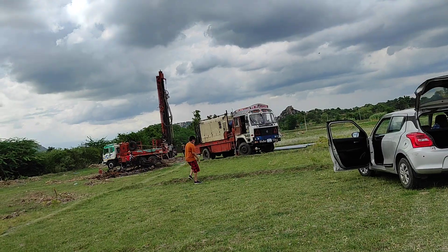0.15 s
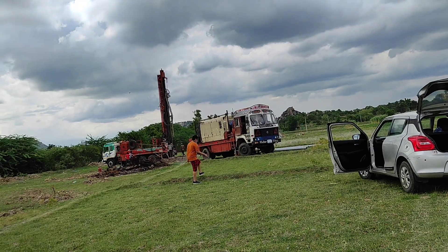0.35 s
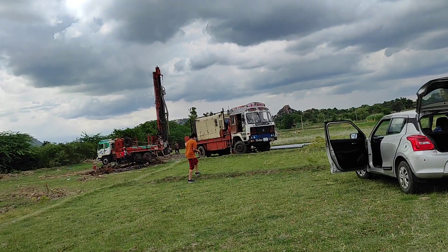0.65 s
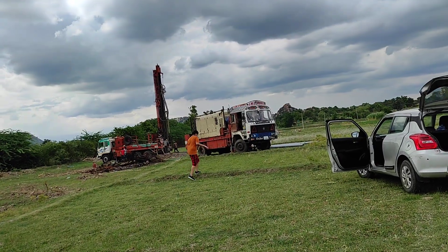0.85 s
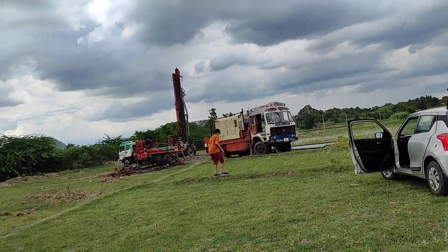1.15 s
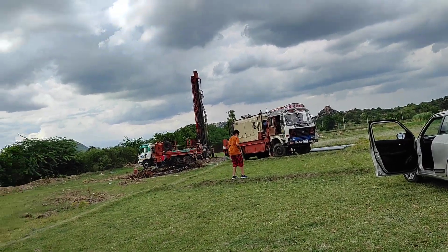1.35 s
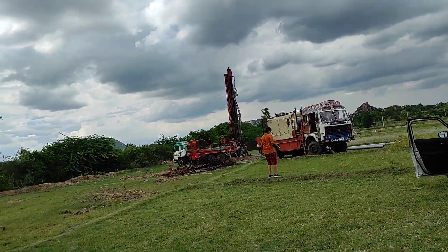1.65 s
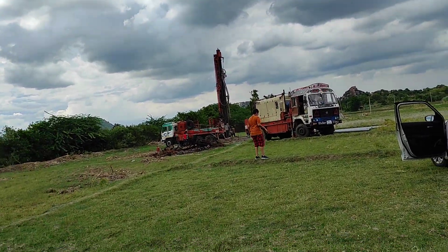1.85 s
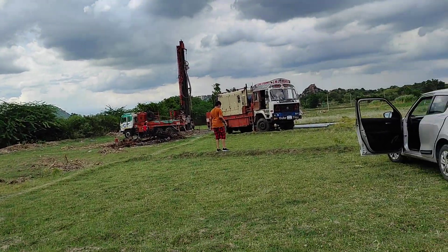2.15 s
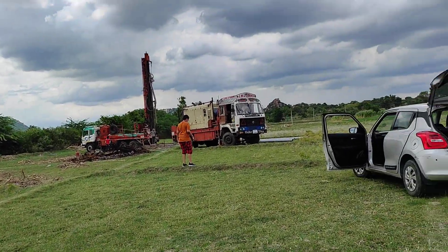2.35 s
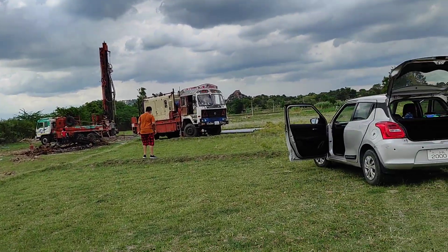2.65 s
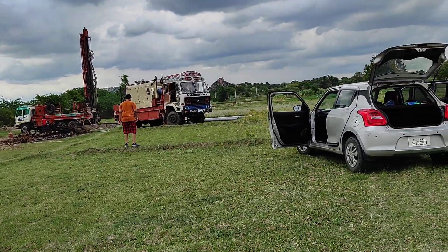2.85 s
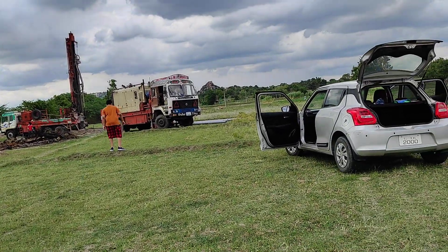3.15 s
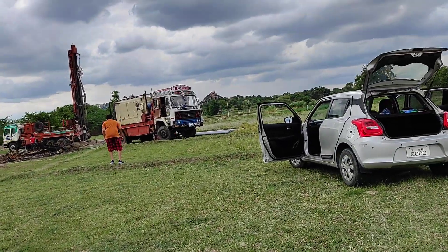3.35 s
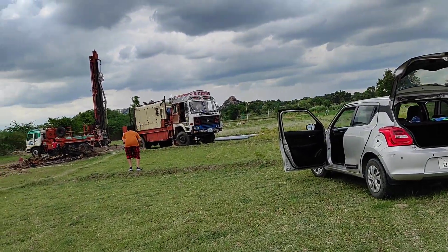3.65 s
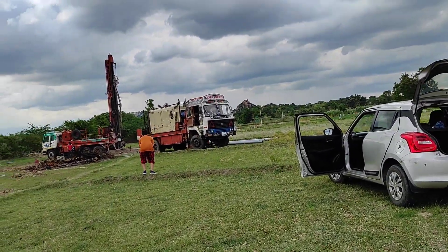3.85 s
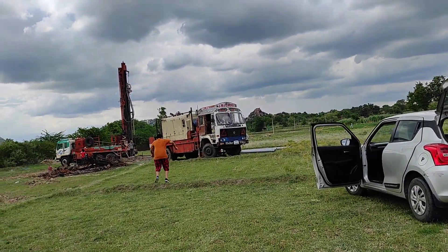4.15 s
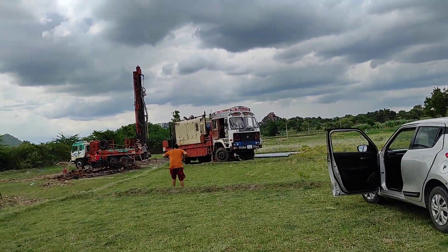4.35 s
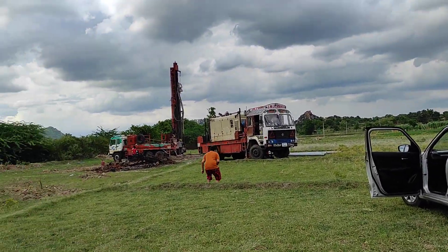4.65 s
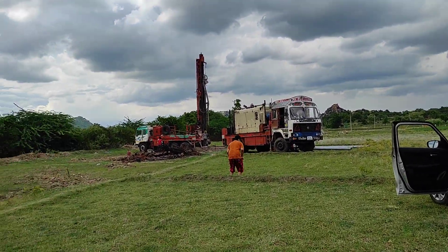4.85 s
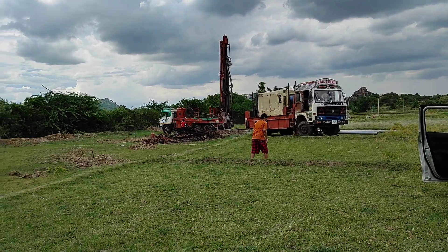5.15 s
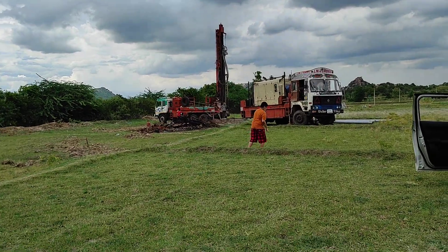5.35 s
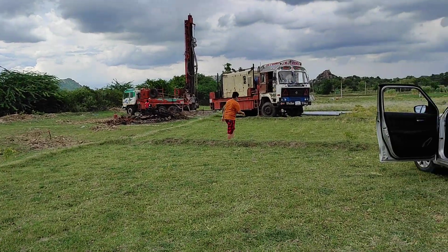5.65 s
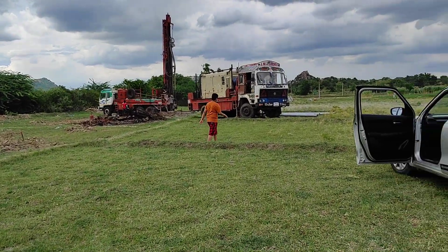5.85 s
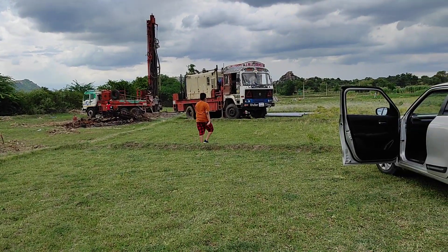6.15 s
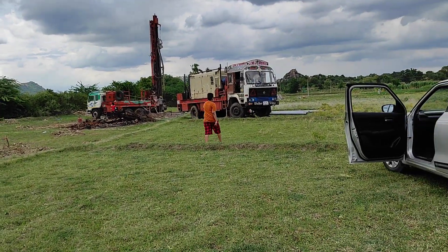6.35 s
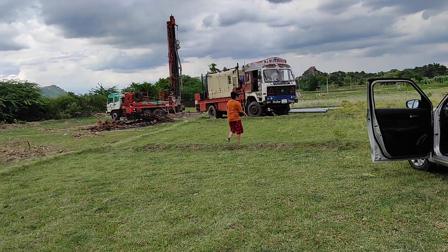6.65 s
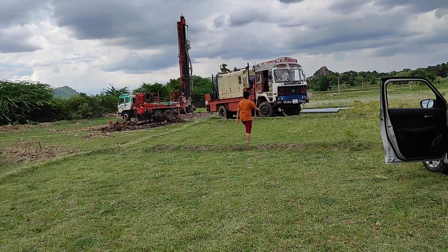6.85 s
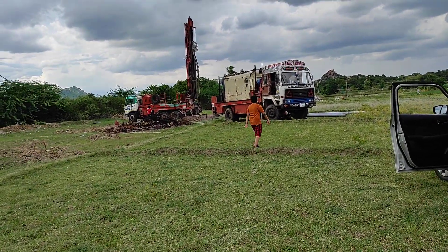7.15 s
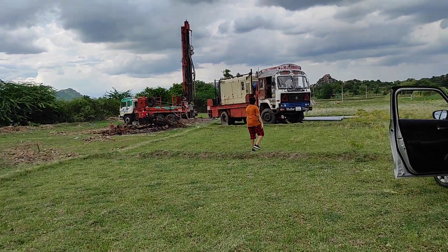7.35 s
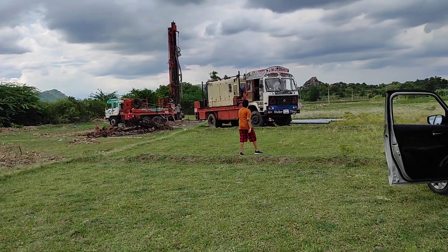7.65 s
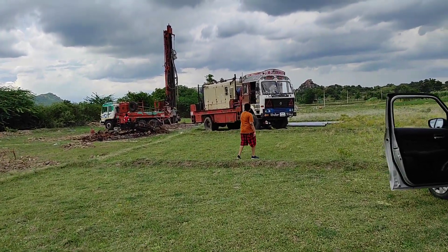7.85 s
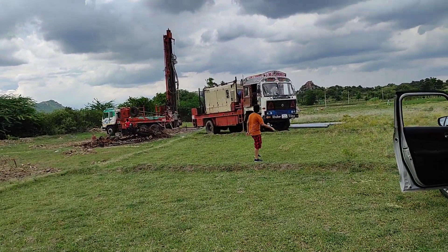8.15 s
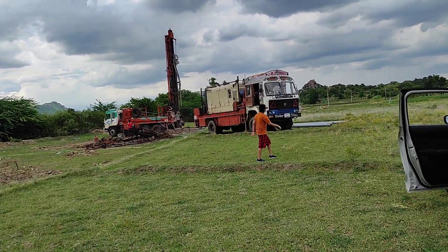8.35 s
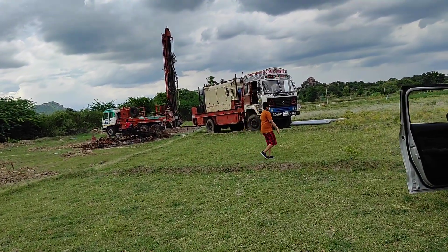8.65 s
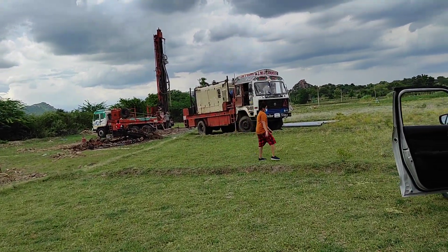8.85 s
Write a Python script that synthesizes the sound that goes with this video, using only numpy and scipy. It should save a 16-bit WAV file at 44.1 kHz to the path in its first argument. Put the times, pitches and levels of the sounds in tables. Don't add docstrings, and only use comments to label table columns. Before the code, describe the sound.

Outdoors in an open grassy field, a truck-mounted drilling rig runs steadily some distance away: a low diesel drone near 100 hertz, exhaust roar, hissing fan and air, a thin high turbine whine. Wind on the hand-held stereo phone begins light, builds to heavy buffeting and thumps in the middle, mostly on the left, then eases.

```python
import sys
import numpy as np
from scipy import signal
from scipy.io import wavfile
from scipy.ndimage import uniform_filter1d, minimum_filter1d

SR = 44100
rng = np.random.default_rng(int(sys.argv[2]) if len(sys.argv) > 2 else 0)


def convert_level_to_amplitude(level_db):
    exponent = np.asarray(level_db, float) / 20
    return 10 ** exponent


def inscribe(sig):
    pcm = np.round(np.clip(np.atleast_2d(sig).T, -1, 1) * 32767)
    wavfile.write(sys.argv[1], SR, pcm.astype(np.int16))


N = 397782
TIME = np.arange(N) / SR
HZ = np.fft.rfftfreq(1024, 1 / SR)[:, None]
CYCLE_HZ = 16.41

# t/s, level/dB
LEFT_GUSTS = [(0, -31), (.5, -23.5), (.75, -19.5), (1.4, -20.5), (1.7, -26), (1.9, -17.5), (2.5, -15.5),
              (2.7, -14.5), (3.4, -12), (3.85, -12.5), (4.5, -12.5), (4.85, -12.5), (5.05, -17.5),
              (5.65, -16.5), (6.0, -13.5), (6.7, -19), (7.4, -19), (9.02, -24)]
# t/s, level/dB
RIGHT_GUSTS = [(0, -41), (1.0, -32), (1.45, -32), (2.45, -38), (2.62, -28), (3.25, -25), (3.45, -21.5),
               (4.0, -22.5), (4.22, -25), (4.45, -18), (4.65, -30), (5.1, -25), (5.35, -35.5), (6.2, -26.5),
               (7.5, -35), (7.9, -31), (8.3, -38), (9.02, -38)]
# f/Hz, level/(dB per Hz)
WIND_COLOUR = [
    [(10, -14), (40, -2), (90, -2), (125, -4), (180, 0), (300, -9), (500, -17), (900, -30), (2000, -55),
     (5000, -90)],
    [(10, -8), (25, 0), (60, -4), (120, -11), (200, -10), (300, -16), (500, -30), (900, -48), (5000, -90)],
]
# t/s, level/dB
THUMP_TIMES = [
    [(2.314, -25), (2.636, -24), (2.994, -21), (3.227, -20), (3.383, -13), (3.445, -16), (3.535, -29), (3.601, -28), (3.705, -17), (4.029, -19), (4.291, -25), (4.383, -19), (4.504, -13), (4.653, -18), (4.757, -29), (5.632, -18), (5.943, -19.5), (6.006, -17), (6.198, -17.5), (6.484, -26)],
    [(2.946, -25), (3.266, -31), (3.425, -16), (3.633, -31), (3.907, -32), (3.996, -25), (4.367, -21), (4.477, -19)],
]
# f/Hz, level/(dB per Hz)
THUMP_COLOUR = [(20, -14), (100, -5), (250, -1), (400, 0), (600, -13.5), (1000, -22.5), (3000, -66)]
# multiple of the cycle, level/dB rms
ENGINE_ORDERS = [(6, -26), (9, -37), (11, -34.5), (12, -32.5), (13, -44.5), (15, -41), (16, -38), (18, -36),
                 (24, -43.5), (25, -51.5), (26, -47), (55, -51.5), (96, -57.5), (100, -64)]
# f/Hz, level/dB rms, waver/Hz
ROTOR_TONES = [(140.3, -36, .4), (280.8, -44, .6), (1122, -59, 1.5), (1334, -54, 3.), (2508, -70, 6.)]
# t/s, f/Hz, level/dB
TURBINE_WHINE = [(0, 10725, -62), (1.4, 10705, -62), (2.2, 10685, -62), (2.7, 10665, -62),
                 (3.2, 10685, -62), (4.2, 10680, -63), (4.7, 10665, -62), (6.2, 10680, -61),
                 (9.02, 10690, -61)]
# f/Hz, level/(dB per Hz)
EXHAUST_COLOUR = [(30, -59), (120, -64.5), (150, -49.5), (210, -46), (300, -56.5), (400, -61.5),
                  (470, -65.5), (570, -54.5), (650, -59.5), (780, -53.5), (900, -62), (1030, -67),
                  (1350, -64.5), (1750, -69.5)]
# f/Hz, level/(dB per Hz)
AIR_COLOUR = [(1750, -69), (2450, -71.5), (2750, -70.5), (3100, -74), (3450, -70), (3800, -72),
              (4800, -75.5), (6200, -70.5), (7350, -65), (8250, -71), (9300, -80), (9900, -86),
              (10800, -89.5), (14200, -99)]
# t/s, level/dB
CARRY_OVER_FIELD = [(0.0, -29), (0.37, -30.8), (0.84, -30), (2.41, -29.5), (2.55, -27.5), (2.97, -28.5),
                    (3.07, -29.5), (3.3, -27.5), (4.09, -31.5), (4.27, -31), (4.46, -29.5), (4.6, -32.5),
                    (4.83, -26.5), (4.97, -29.5), (7.2, -28), (7.29, -29.5), (8.82, -28.5), (9.01, -28.1)]
# t/s, lead of the left port/microseconds
HAND_SWAY = [(0, 10), (.95, -14), (1.36, 5), (1.57, 106), (2.15, 62), (2.35, -8), (3.0, -98), (3.55, -92),
             (4.05, -32), (4.55, -42), (5.03, 108), (5.45, 84), (6.08, -24), (6.75, -10), (6.95, 50),
             (8.1, -10), (8.55, 30), (9.02, -8)]
# f/Hz, louder by/dB
LEFT_DUCT_GAIN = [(100, 5), (650, 2), (980, 6), (1200, 2), (1550, 4.5), (2300, 2), (3100, -8), (3500, 1),
                  (5000, 4.5), (5800, 5), (6900, -9), (8300, 9), (9650, 10), (10450, 1.5)]
# f/Hz, lead/radians
LEFT_DUCT_TURN = [(400, -.1), (950, 0), (1090, -.7), (1350, -.1), (1900, -.8), (2600, -1.4), (2950, -.8),
                  (3270, -4.8), (3620, -5.7), (4300, -6.3), (6400, -7.2), (6750, -7.0), (7500, -5.0),
                  (9500, -6.8)]
# f/Hz, likeness/(0 to 1)
PORT_LIKENESS = [(100, .99), (900, .97), (1500, .92), (2400, .9), (3100, .6), (3700, .96), (5000, .96),
                 (6000, .92), (6900, .5), (8000, .7), (9500, .4), (10500, .2)]
# f/Hz, left/dB, right/dB
BODY_SHADE = [(300, 0.5, 0), (820, 0.6, 1.1), (1430, -1.5, -1.5), (2170, 0.7, -0.2), (3500, 0.5, -.5),
              (6000, .5, -.5), (9050, .5, -0.5)]
# f/Hz, level/(dB per Hz)
FAINTEST_KEPT = [(300, -72), (1000, -75), (2000, -78), (3200, -78.5), (5000, -78.5), (7000, -78),
                 (9000, -81), (10300, -81), (11000, -83), (12400, -90), (14200, -94)]


def evened(x):
    return x / np.sqrt(np.mean(x ** 2) + 1e-20)


def read(points, hz):
    f, value = np.transpose(points)
    return np.interp(np.log(hz + 1), np.log(f + 1), value)


def column(table, t, axis):
    columns = np.transpose(table)
    return np.interp(t, columns[0], columns[axis])


def frames(x):
    return signal.stft(x, SR, nperseg=1024, noverlap=768)[1:]


def sound(z):
    return signal.istft(z, SR, nperseg=1024, noverlap=768)[1][..., :N]


def level(z, lo_hz, hi_hz, size):
    band = z[(HZ[:, 0] > lo_hz) & (HZ[:, 0] < hi_hz)]
    power = 4 / 3 * (abs(band) ** 2).sum(0)
    return np.sqrt(uniform_filter1d(power, size) + 1e-20)


def drift(top_hz):
    rates = np.geomspace(top_hz / 30, top_hz, 16)[:, None]
    t = TIME[::256]
    waves = np.sin(2 * np.pi * (rates * t + rng.random(rates.shape)))
    slow = (waves / np.sqrt(rates)).sum(0)
    return np.interp(TIME, t, evened(slow))


def patchy(shape, tall, wide):
    field = uniform_filter1d(rng.standard_normal(shape), tall, 0)
    return evened(uniform_filter1d(field, wide, 1))


def buffeting():
    gust_db = column(LEFT_GUSTS, TIME, axis=1)
    turned = column(HAND_SWAY, TIME, axis=1) / 100
    bite_db = -5 + .3 * (gust_db - gust_db.mean()) - 1.2 * turned + 1.3 * drift(4.)
    left_db = gust_db + 0.55 * drift(4.)
    right_db = column(RIGHT_GUSTS, TIME, axis=1) + drift(4.)
    return left_db, right_db, bite_db


def wind():
    out = []
    left_db, right_db, left_bite_db = buffeting()
    ports = ((left_db, 290, -0.037), (right_db, 100, -1.0))  # level/dB, top of rumble/Hz, trim/dB
    for port, (gust_db, top_hz, trim_db) in enumerate(ports):
        lumps = evened(uniform_filter1d(uniform_filter1d(rng.standard_normal(N), 700), 700))
        strength = np.clip((gust_db - gust_db.max() + 14.0) / 14, 0, 1)
        t, z = frames(rng.standard_normal(N) * convert_level_to_amplitude(5.3 * strength * lumps))
        if port == 0:
            bite_db = np.interp(t, TIME, left_bite_db)
        else:
            bite_db = 6 * np.interp(t, TIME, strength) - 5
        tilt = np.clip(HZ / 180 - 1, -.35, 1)
        z = z * convert_level_to_amplitude(read(WIND_COLOUR[port], HZ) + bite_db * tilt)
        out.append(sound(z / level(z, 20, top_hz, size=24)) * convert_level_to_amplitude(gust_db + trim_db))
    return np.array(out)


def thumps():
    out, steps = [], TIME[::64]
    for table in THUMP_TIMES:
        z = frames(rng.standard_normal(N))[1] * convert_level_to_amplitude(read(THUMP_COLOUR, HZ))
        shape = sum(convert_level_to_amplitude(db + 1.5) * np.exp(-((steps - s) / .014) ** 2) for s, db in table)
        out.append(sound(z / level(z, 300, 520, size=5)) * np.interp(TIME, steps, shape))
    return np.array(out)


def tones():
    crank = np.cumsum(CYCLE_HZ * (1 + 0.001263 * drift(2.5))) / SR
    out = np.zeros(N)
    for order, db in ENGINE_ORDERS:
        loudness = convert_level_to_amplitude(db + .6 * drift(6.))
        out += loudness * np.cos(2 * np.pi * (round(order) * crank + rng.random()))
    for hz, db, waver_hz in ROTOR_TONES:
        loudness = convert_level_to_amplitude(db + 0.56 * drift(5.3))
        out += loudness * np.cos(2 * np.pi * np.cumsum(hz + waver_hz * drift(5.5)) / SR)
    jitter_hz = 36 * evened(uniform_filter1d(rng.standard_normal(N), size=500))
    whine_hz = column(TURBINE_WHINE, TIME, axis=1) + jitter_hz
    whine_db = column(TURBINE_WHINE, TIME, axis=2) + 4.5 + 1.5 * drift(30.)
    whine = convert_level_to_amplitude(whine_db) * np.cos(2 * np.pi * np.cumsum(whine_hz) / SR)
    return np.sqrt(2) * (out + whine)


def roar():
    throb = 1 + .025 * np.cos(2 * np.pi * 6 * CYCLE_HZ * TIME)
    t, z = frames(rng.standard_normal((2, N)) * throb * np.sqrt(SR / 2))
    patches = patchy(z.shape[1:], 14, 30)
    carry_db = column(CARRY_OVER_FIELD, t, axis=1)
    carry_db = carry_db - carry_db.mean()
    low_db = 0.6 * carry_db - 0.02 * np.interp(t, TIME, drift(4.2))
    high = np.clip((HZ - 1500) / 2200, 0, 1)
    far = HZ < 10500
    swell_db = (1 - high) * low_db * np.clip(HZ / 450, 0, 1) + high * carry_db
    flicker_db = .7 * high * np.interp(t, TIME, drift(40.))
    colour_db = read(EXHAUST_COLOUR + AIR_COLOUR[1:], HZ)
    return t, z * convert_level_to_amplitude(colour_db + far * (swell_db + flicker_db) + 0.86 * patches)


def rig():
    t, (noise, other) = roar()
    lines = frames(tones())[1]
    lead = column(HAND_SWAY, t, axis=1) / 100
    same = np.clip(read(PORT_LIKENESS, HZ), 0, 1)
    left = lines + same * noise + np.sqrt(1 - same ** 2) * other
    right = lines + noise
    duct_hz = HZ * (1 - 0.016 * lead)
    ripples = .27j * patchy(left.shape, 5, 60) + .16 * patchy(left.shape, 5, 60)
    echoes = np.clip(HZ / 1800, 0, 1) * ripples
    turn = read(LEFT_DUCT_TURN, duct_hz) + 2 * np.pi * HZ * lead / 10 ** 4
    hz, left_shade, right_shade = np.transpose(BODY_SHADE)
    wander_db = 0.27 * np.interp(t, TIME, drift(2.7)) * np.clip(HZ / 3000, 0, 1)
    left_db = lead * np.interp(HZ, hz, left_shade) + wander_db
    right_db = lead * np.interp(HZ, hz, right_shade)
    left = left * convert_level_to_amplitude(read(LEFT_DUCT_GAIN, duct_hz) + left_db) * np.exp(1j * turn + echoes)
    return sound(np.array([left, right * convert_level_to_amplitude(right_db)]))


def scene():
    return rig() + wind() + thumps()


def band_powers(z, width):
    return (abs(z) ** 2).reshape(2, -1, width, z.shape[-1])


def sum_and_difference(z):
    return np.array([z[0] + z[1], z[0] - z[1]]) / np.sqrt(2)


def coarse(x):
    hz, t, z = signal.stft(x, SR, "cosine", nperseg=2048)
    z, width = z[:, :1024], 8
    turned = sum_and_difference(z)
    plain = band_powers(z, width).sum(2).min(0)
    summed = band_powers(turned, width).sum(2).min(0)
    pick = np.repeat(summed < plain, width, axis=0)
    luck = uniform_filter1d(rng.standard_normal((32, len(t))), size=2, axis=1)
    budget_db = np.repeat(2.2 * evened(np.repeat(luck, 4, axis=0)), width, axis=0)
    step = 2.05 * convert_level_to_amplitude(read(FAINTEST_KEPT, hz[:1024, None]) + budget_db)
    step = step * np.sqrt(SR * np.pi ** 2 / 16 / 2048)
    kept = np.where(pick, turned, z)
    power = np.repeat(band_powers(kept, width).mean(2), width, axis=1)
    kept = np.round(kept / step) * step * (power > step ** 2 / 8)
    kept = np.where(pick, sum_and_difference(kept), kept)
    kept = np.pad(kept, ((0, 0), (0, 1), (0, 0)))
    return signal.istft(kept, SR, "cosine", nperseg=2048)[1][:, :N]


def low_pass(x):
    return signal.sosfilt(signal.butter(12, 14266.67, fs=SR, output="sos"), x)


def record(dry):
    peak = -minimum_filter1d(-abs(dry), size=500, axis=1)
    held = dry / uniform_filter1d(np.maximum(peak / .8, 1), size=400, axis=1)
    return low_pass(coarse(held))


dry = scene()
out = record(dry)
inscribe(out)
```